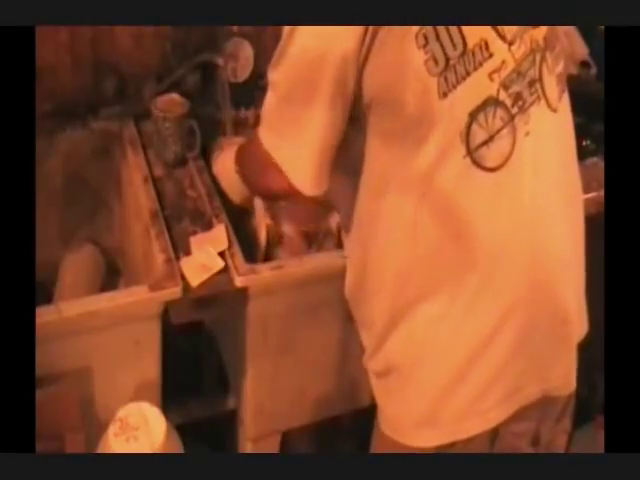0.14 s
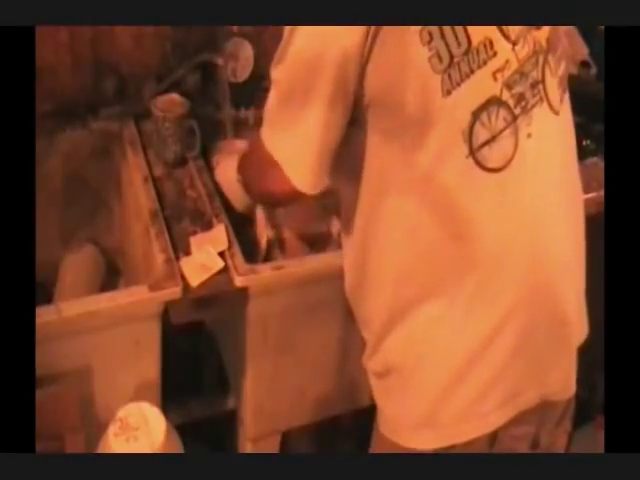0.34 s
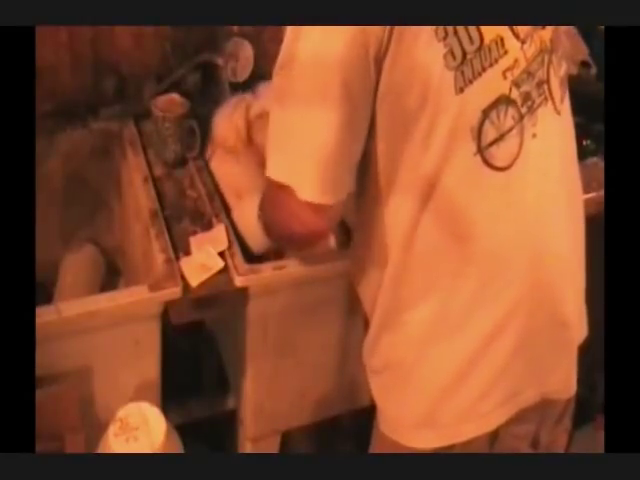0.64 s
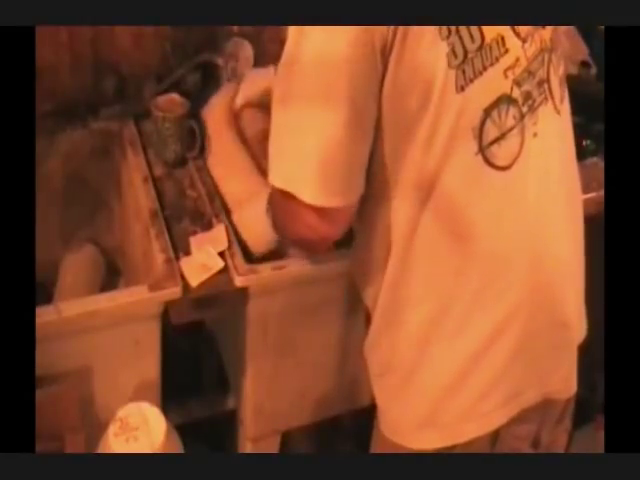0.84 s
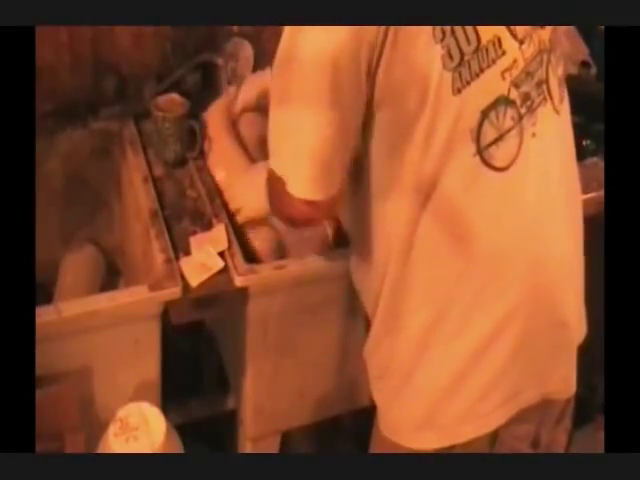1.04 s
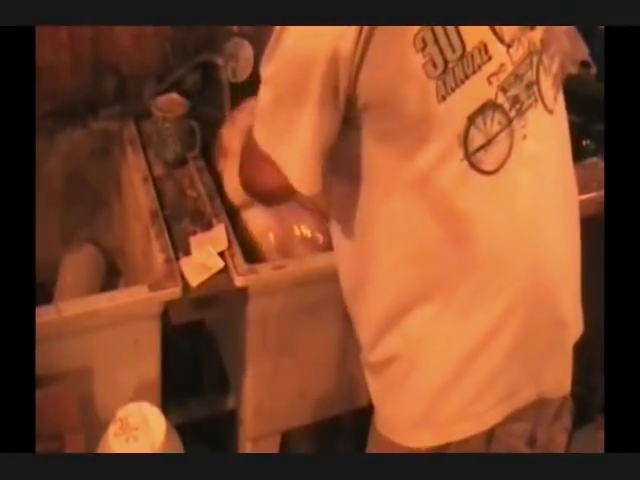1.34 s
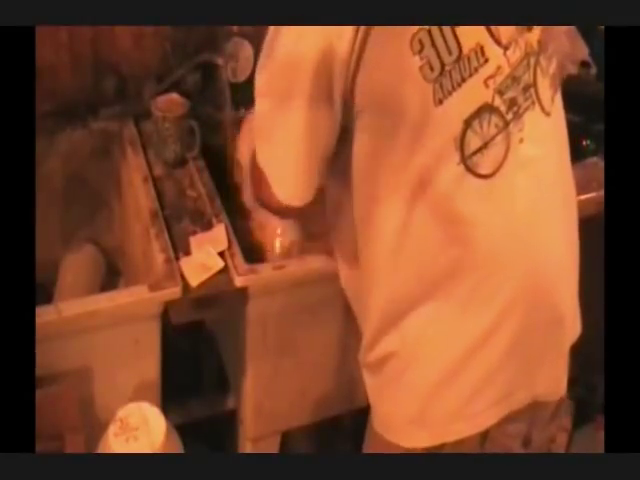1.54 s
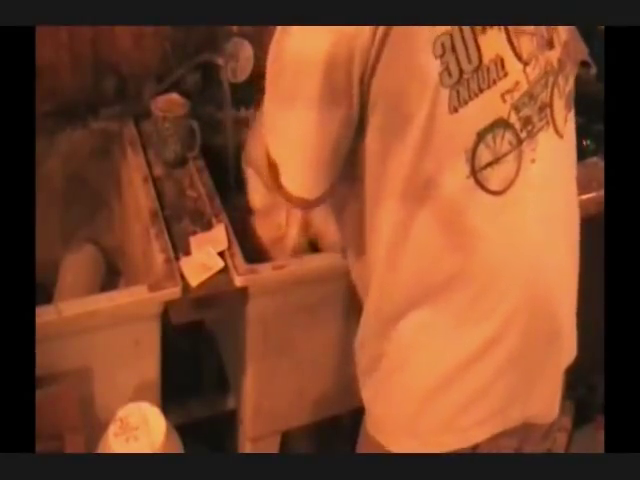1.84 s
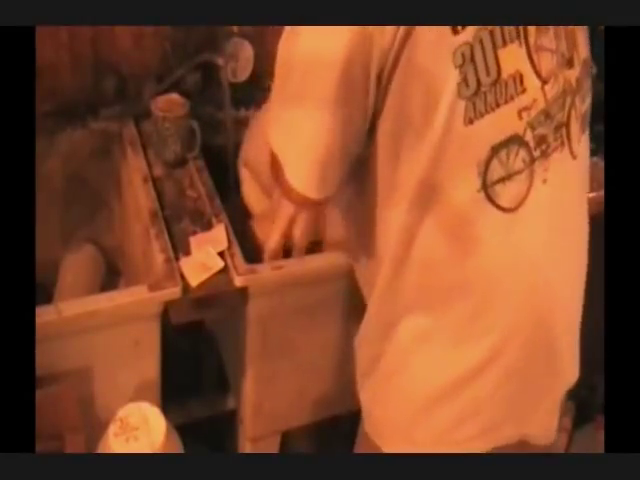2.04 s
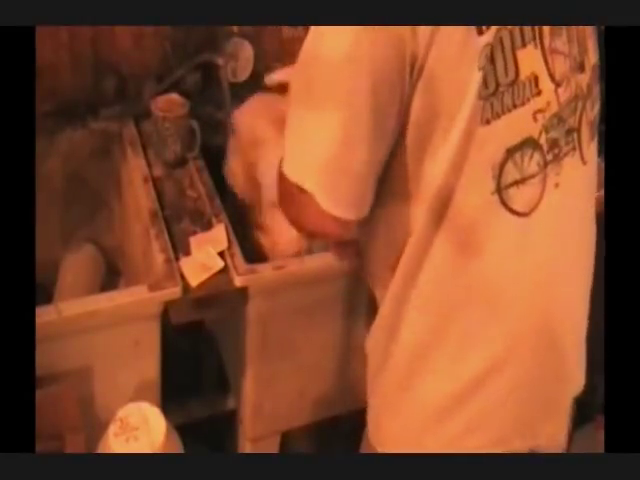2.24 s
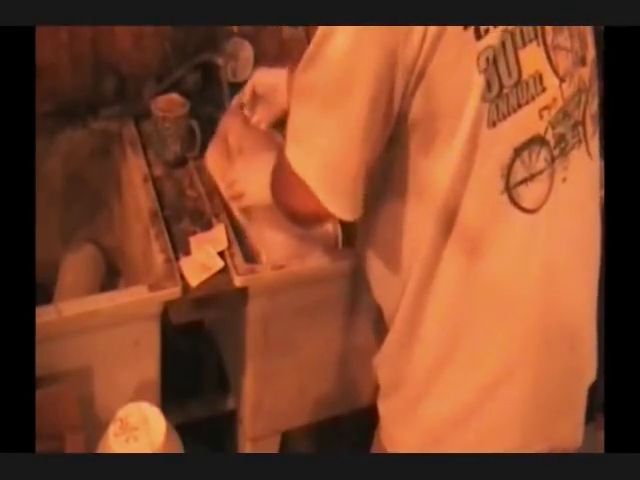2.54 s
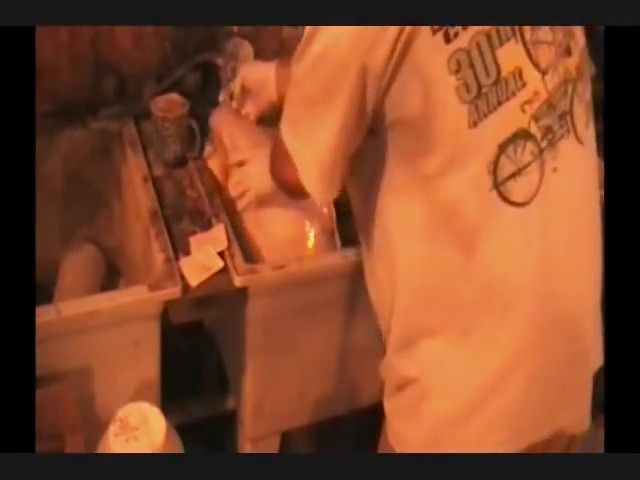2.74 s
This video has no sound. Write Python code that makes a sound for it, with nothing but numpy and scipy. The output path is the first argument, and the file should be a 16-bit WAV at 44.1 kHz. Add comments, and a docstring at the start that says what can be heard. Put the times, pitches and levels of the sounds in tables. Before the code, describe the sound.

Continuous hissing tap water in a plastic basin; a burst of splashes early, a calmer spell, then more dripping and slapping as a hide is turned, with one soft thud, heard on close stereo microphones.

```python
"""Tap running into a plastic basin

In a workshop, broadband noise from a tap's valve excites the resonances of spout and plastic sink.
Water sheds off a wet hide as spray (shaped noise), droplets and bubbles (damped sines) and slaps
(filtered impulses). The hide bumps the basin once, as a low sum of modes with a dull rub.
The room adds a decaying tail to droplets, slaps, bubbles and bump; mains hum is a faint sine."""
import sys
import numpy as np
from scipy import signal
from scipy.fft import rfft, irfft, next_fast_len
from scipy.io import wavfile
from scipy.ndimage import uniform_filter1d, map_coordinates

SR = 44100
rng = np.random.default_rng(int(sys.argv[2]) if len(sys.argv) > 2 else 0)


def wav_out(sig):
    """Save sig, one row per channel (or a flat mono array), as 16-bit PCM at SR to the path in sys.argv[1]."""
    wavfile.write(sys.argv[1], SR, np.round(np.clip(np.atleast_2d(sig).T, -1, 1) * 32767).astype(np.int16))


def amplitude_ratio(level_db):
    """Convert a level in decibels to the matching linear amplitude (field) ratio."""
    exponent = np.asarray(level_db, float) / 20
    return 10 ** exponent


N = 127890  # samples


def unit(x):
    """Normalisation to an rms value of one."""
    return x / np.sqrt(np.mean(x ** 2) + 1e-20)


def along(points, hz):
    """Interpolation of (f/Hz, value) points on a logarithmic frequency axis."""
    f, v = np.transpose(points)
    return np.interp(np.log(hz + 1), np.log(f + 1), v)


def wobble(rate):
    """Slow random modulation: a spline through random knots, rate of them a second."""
    knots = rng.standard_normal(int(N * rate / SR) + 4)
    return map_coordinates(knots, [np.arange(N) * rate / SR])


def filtered(x, response):
    """Linear filtering: the spectrum of x times a complex response of frequency."""
    m = next_fast_len(x.shape[-1] + 8192)
    spectrum = rfft(x, m) * response(np.fft.rfftfreq(m, 1 / SR))
    return irfft(spectrum, m)[..., :x.shape[-1]]


def rush(gain, patchy_db):
    """Turbulence noise: patchy in time and frequency, coloured by gain(Hz), partly coherent in stereo."""
    # likeness of the two channels: f/Hz, correlation coefficient
    likeness = [(30, 0.29), (150, 0.51), (300, 0.79), (1500, .9), (5000, .94), (8000, 0.83), (11000, 0.69),
                (15000, 0.29)]
    z = signal.stft(rng.standard_normal((2, N)), nperseg=256)[2]
    field = uniform_filter1d(rng.standard_normal(z.shape[1:]), size=5, axis=0)
    field = uniform_filter1d(field, size=12, axis=1)
    pair = signal.istft(z * amplitude_ratio(patchy_db * unit(field)), nperseg=256)[1][:, :N]

    def mid_and_side(hz):
        # cos^2 - sin^2 of this angle is the correlation of left and right
        angle = np.arccos(np.clip(along(likeness, hz), -1, 1)) / 2
        return gain(hz) * [np.cos(angle), np.sin(angle)]

    mid, side = filtered(pair, mid_and_side)
    return np.array([mid + side, mid - side])


def rings(s, db, hz, cycles, rise, attack_s, size):
    """Damped free oscillation: sines falling 60 dB in so many cycles while their pitch rises, summed."""
    t = np.arange(size) / SR
    u = t * (hz / cycles)[:, None]  # one at 60 dB of decay
    envelope = amplitude_ratio(db[:, None] - 60 * u) * (1 - np.exp(-t / attack_s))
    wave = envelope * np.sin(2 * np.pi * hz[:, None] * t * (1 + rise * u))
    at = (s * SR).astype(int)[:, None] + np.arange(size)
    return np.bincount(at.ravel(), wave.ravel(), N + size)[:N]


def tap():
    """Resonant filtering of flow noise: broad hiss, plus a narrow band for each mode of spout and basin."""
    # broad colour of the stream: f/Hz, relative level/dB
    hiss = [(30, -43), (80, -40), (115, -26), (150, -26), (300, -19), (420, -20.5), (700, -16),
            (1320, -13.5), (2200, -13), (4400, -12), (5300, -3.5), (7720, -14.5), (10100, -16),
            (11200, -20.5), (12200, -25), (14300, -34), (15700, -33)]
    # lesser resonances of spout and pipe: f/Hz, width at half amplitude/Hz, level over the broad colour/dB
    spout = [(2505, 48, 3), (2639, 69, 8), (3700, 180, 4.5), (4648, 99, 3), (5105, 51, 5.5), (5730, 250, 3),
             (6025, 49, 10.5), (6650, 160, 4.5), (7350, 150, 8.5), (8320, 370, 3), (8960, 90, 9.5),
             (9660, 300, 7), (10380, 84, 4.5), (10570, 152, 11.5), (11360, 220, 4.5), (11750, 150, 5.5),
             (14750, 200, 8)]
    # resonances of the basin: f/Hz, width at half amplitude/Hz, level over the broad colour/dB
    basin = [(178.5, 14.8, 10), (230, 13, 7.5), (329.4, 39, 14), (621, 81, 6.5), (878.3, 38, 9),
             (1328, 61, 6), (1594, 90, 4), (470, 84, 1)]
    # main resonance of the spout: t/s, level over the broad colour/dB
    whistle_levels = [(0, 7), (.3, 10.5), (.6, 8.5), (.75, 15), (.97, 10), (1.19, 16), (1.42, 5.5),
                      (1.8, 15.5), (2, 8.5), (2.09, 14.5), (2.25, 10.5), (2.6, 10.5), (2.9, 10)]
    hiss_db = -37  # rms of the broad hiss before its slow modulation
    whistle_hz, whistle_width_hz, whistle_drift_hz = 5290, 124, 35

    def band(hz, width):
        return rush(lambda f: amplitude_ratio(along(hiss, f)) / (1 + (2 * (f - hz) / width) ** 2), patchy_db=-1)

    broad = rush(lambda hz: amplitude_ratio(along(hiss, hz)), patchy_db=2.11)
    scale = amplitude_ratio(hiss_db) / np.sqrt(np.mean(broad ** 2))
    # each of these resonances swells and fades on its own
    sung = sum(amplitude_ratio(db + 1.7 * wobble(12)) * band(hz, width) for hz, width, db in spout)
    drummed = sum(amplitude_ratio(db + 1.1 * wobble(5.5)) * band(hz, width) for hz, width, db in basin)
    # crossfading two neighbouring bands lets the main resonance wander up and down
    whistle_db = np.interp(np.arange(N) / SR, *np.transpose(whistle_levels)) + 0.49 * wobble(90)
    turn = np.pi / 4 * (1 + np.tanh(wobble(7.06)))
    low = band(whistle_hz - whistle_drift_hz, whistle_width_hz)
    high = band(whistle_hz + whistle_drift_hz, whistle_width_hz)
    whistle = amplitude_ratio(whistle_db) * (np.cos(turn) * low + np.sin(turn) * high)
    return scale * amplitude_ratio(0.6 * wobble(6.16)) * (broad + sung + drummed + whistle)


def hum():
    """Mains hum: a single faint sine with slow amplitude modulation."""
    hum_hz, hum_db = 59.5, -84
    return amplitude_ratio(hum_db + 1.5 * wobble(6)) * np.sin(2 * np.pi * hum_hz * np.arange(N) / SR)


def shedding():
    """Noise and random damped pulses under one flow envelope: spray, and clumped droplets, rarely big."""
    # water shedding off the hide: t/s, level/dB
    shed = [(0, -39.5), (.4, -46), (.46, -38.5), (.53, -40), (.6, -33.5), (.67, -38), (.74, -46.5),
            (1.2, -42.5), (1.45, -52), (1.62, -41.5), (1.8, -36), (1.89, -42), (1.93, -33), (2.02, -40),
            (2.07, -36), (2.22, -39.5), (2.32, -44), (2.6, -39), (2.72, -49), (2.77, -39), (2.81, -44),
            (2.9, -41)]
    # colour of the spray: f/Hz, relative level/dB
    spray_colour = [(500, -36), (1200, -55), (2500, -7.5), (4000, -6.5), (6500, -2.5), (9000, -4.5),
                    (12000, -21), (15500, -35)]
    droplet_hz, droplet_octaves, droplet_cycles = 4600, .55, 20
    droplet_spread_db, droplet_db = 1.9, -8  # droplet_db is relative to the flow
    flow = amplitude_ratio(np.interp(np.arange(N) / SR, *np.transpose(shed)))
    noise = rush(lambda hz: amplitude_ratio(along(spray_colour, hz)), patchy_db=2.5)
    spray = unit(amplitude_ratio(0.83 * wobble(40.12)) * noise)
    draw, pitch = rng.random((4000, 2)), rng.standard_normal(4000)
    hz = droplet_hz * 2 ** (droplet_octaves * np.clip(pitch, -1.3, 2))
    size_db = -droplet_spread_db * np.log(draw[:, 1] + .02)
    drops = rings(draw[:, 0] * N / SR, size_db, hz, droplet_cycles, rise=.1, attack_s=.0003, size=400)
    clumped = unit(drops * amplitude_ratio(0.71 * wobble(25.02)))
    return flow * spray, amplitude_ratio(droplet_db) * flow * clumped


def room(x):
    """Reverberation: convolution with noise whose decay depends on frequency, its own in each channel."""
    # decay of the workshop: f/Hz, time to fall 60 dB/s
    decay = [(200, 0.52), (3000, 0.28), (12000, 0.38)]
    hz, t, z = signal.stft(rng.standard_normal((2, SR // 3)), SR, nperseg=256)
    tail = signal.istft(z * amplitude_ratio(-60 * t / along(decay, hz)[:, None]), SR, nperseg=256)[1]
    delayed = np.pad(x, (150, 0))[None]  # 3.4 ms before the tail begins
    return signal.fftconvolve(delayed, tail / np.linalg.norm(tail[0]), axes=1)[:, :N]


def slaps():
    """Impulse response of a resonator: a blow and dying fizz ring briefly, the basin wall echoing once."""
    # sharp slaps of water: t/s, peak level before the echo/dB, centre f/Hz, width as a share of the centre
    slap_list = [(.25, -25, 7750, .3), (0.4473, -13, 6400, .8), (.4625, -21, 7400, 0.46),
                 (.5761, -15.5, 2250, .36), (.6429, -17.5, 6850, .3), (2.058, -23, 7000, .7),
                 (2.059, -24, 3250, .45), (2.3795, -22, 2750, .6), (2.627, -24, 2900, .8),
                 (.5965, -26, 5550, .3), (.6205, -29, 8500, .6), (0.7123, -23, 7500, .5),
                 (.936, -25, 8000, 0.42), (1.271, -23.5, 8000, 0.53), (1.605, -17, 5000, 0.92),
                 (1.82, -19, 6250, .6), (1.926, -23, 6500, 0.65), (1.946, -18.5, 7000, 0.48),
                 (1.979, -25, 7600, .4), (1.992, -28.5, 3200, .3), (2.097, -26, 3700, 0.28),
                 (2.111, -24, 4750, .25), (2.116, -23, 8300, .4), (2.203, -25, 6500, 0.56),
                 (2.207, -33, 4100, 0.33), (2.471, -22, 7300, 0.4), (2.471, -28.5, 3200, .5),
                 (2.748, -22.5, 3870, .5), (2.771, -25, 4200, 0.44), (2.799, -23, 7950, 0.35),
                 (2.892, -21, 6150, 0.36)]
    fizz_t60_s, fizz_db, top_hz = .028, -21, 10500  # fizz_db is relative to the blow
    echo_s, echo_db = .0036, -9
    out, t = np.zeros(N + 4096), np.arange(4096) / SR
    for s, db, centre, share in slap_list:
        fizz = amplitude_ratio(fizz_db - 60 * t / fizz_t60_s) * rng.standard_normal(4096)
        blow = fizz + (t == 0)

        def resonance(f):
            damping = 1j * f * share * centre
            bandpass = (damping / (centre * centre - f * f + damping)) ** 3
            return bandpass / (1 + (f / top_hz) ** 12)  # steep fall above top_hz

        burst = filtered(blow, resonance)
        out[round(s * SR):][:4096] += amplitude_ratio(db) * burst / np.abs(burst).max()
    echo = np.pad(out, (round(echo_s * SR), 0))[:N]
    return out[:N] + amplitude_ratio(echo_db) * echo


def plinks():
    """Bubble resonance: trapped air rings while its pitch rises; low bubbles last fewer cycles."""
    # drops that trap a bubble: t/s, level before attack and decay/dB, starting f/Hz
    bubbles = [(.5795, -27, 2400), (0.612, -27, 2620), (.629, -28, 2750), (0.644, -24, 6670),
               (.665, -24.5, 1790), (0.812, -31, 2750), (1.209, -40.5, 608), (1.564, -41, 1020),
               (1.66, -38, 1150), (1.7, -31, 3000), (1.803, -33, 1014), (1.825, -33, 1205),
               (1.87, -27.5, 3040), (1.955, -27, 7360), (2.026, -24, 2900), (2.06, -26, 3160),
               (2.202, -21, 3170), (2.379, -30, 2965), (2.405, -36, 2920), (2.529, -35, 1066),
               (2.568, -30, 2600), (2.648, -34.5, 1140), (2.664, -31, 2670), (2.866, -36, 592)]
    s, db, hz = np.transpose(bubbles)
    cycles = 78 * np.sqrt(hz / 2700)  # 78 cycles at 2700 Hz
    return rings(s, db, hz, cycles, rise=0.067, attack_s=0.0021, size=4096)


def bump():
    """Modal excitation by soft contact: the hide thuds low on the basin wall, with a dull noise rub."""
    # what the wall rings with: f/Hz, relative level/dB
    modes = [(112, 0), (150, -4), (225, -13), (320, 3), (450, 2)]
    bump_s, bump_db, bump_t60_s, attack_s, rub_db = 2.402, -45.5, 0.14, 0.0062, 2
    t = np.clip(np.arange(N) / SR - bump_s, 0, None)
    shape = (1 - np.exp(-t / attack_s)) ** 2 * amplitude_ratio(bump_db - 60 * t / bump_t60_s)
    rub_colour = [(70, -60), (120, -4), (480, 0), (800, -40)]  # f/Hz, relative level/dB
    rub = unit(filtered(rng.standard_normal(N), lambda hz: amplitude_ratio(along(rub_colour, hz))))
    thud = sum(amplitude_ratio(db) * np.sin(2 * np.pi * hz * t) for hz, db in modes)
    return shape * (thud + amplitude_ratio(rub_db) * rub)


def scene():
    """Superposition: stream, spray and hum, with high-passed events and their reverberation."""
    low_cut_hz, room_db = 70, -9.5
    spray, droplets = shedding()
    knocks = droplets + slaps() + plinks() + bump()
    events = filtered(knocks, lambda hz: (1j * hz / (low_cut_hz + 1j * hz)) ** 3)
    return tap() + spray + events + amplitude_ratio(room_db) * room(events) + hum()


def low_pass(x):
    """Removes everything above the highest recorded frequency."""
    return signal.sosfilt(signal.butter(12, 15740, fs=SR, output="sos"), x)


def record(dry):
    """Interchannel level and phase difference: two close microphone ports, cut off at the top."""
    # phase between the ports: f/Hz, lead of the left/rad
    lead = [(100, 0), (4650, 0.25), (7700, 0), (9100, 1.44), (11000, 0.37), (12100, 1.1), (13700, 0.43)]
    # level between the ports: f/Hz, left over right/dB
    left_over_right = [(100, -0.5), (400, -0.4), (2000, 1.7), (6000, 0), (13000, 2.3)]
    top_hz = 15720
    side = np.array([[.5], [-.5]])  # half of each difference to either port

    def port_response(hz):
        level = amplitude_ratio(side * along(left_over_right, hz))
        return (hz < top_hz) * level * np.exp(1j * side * along(lead, hz))

    return low_pass(filtered(dry, port_response))


dry = scene()
out = record(dry)
wav_out(out)
```